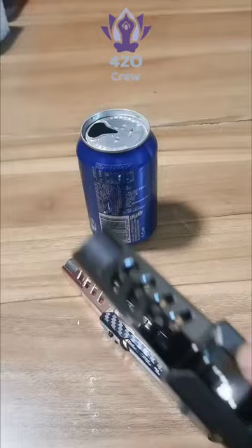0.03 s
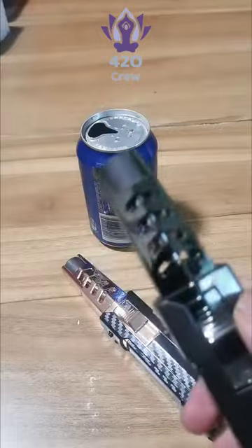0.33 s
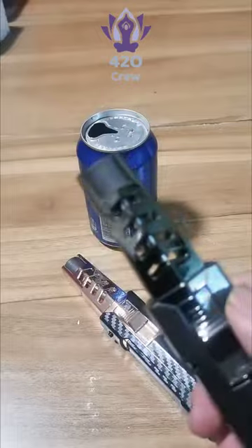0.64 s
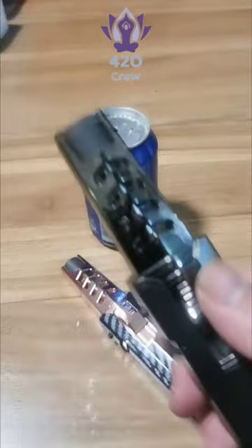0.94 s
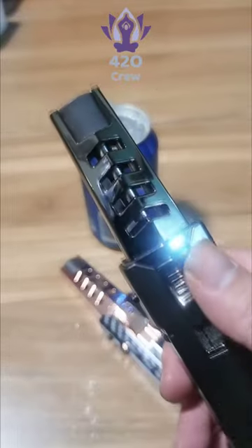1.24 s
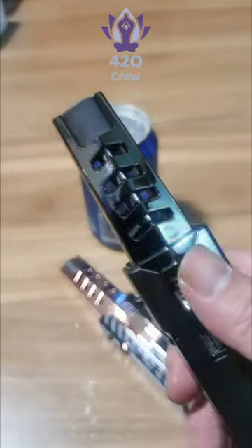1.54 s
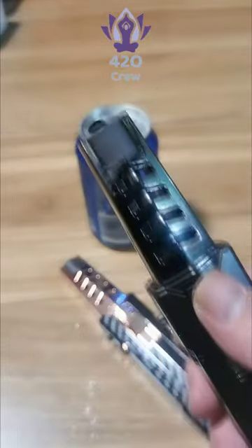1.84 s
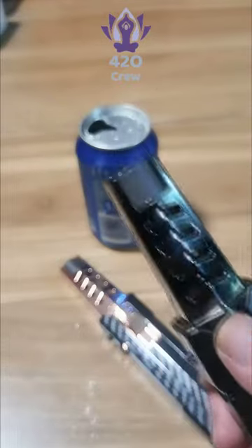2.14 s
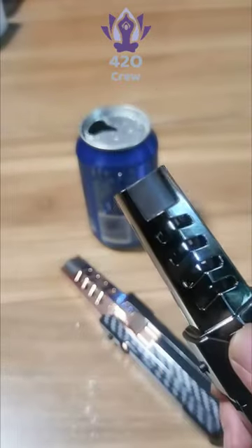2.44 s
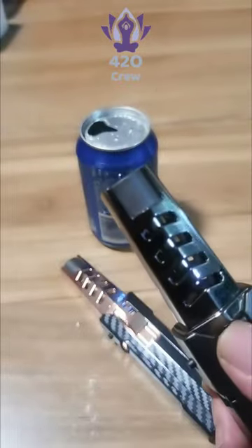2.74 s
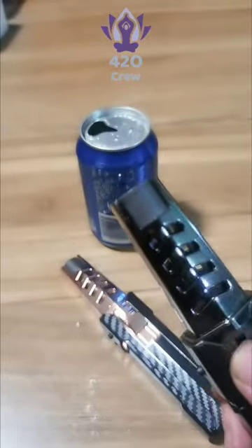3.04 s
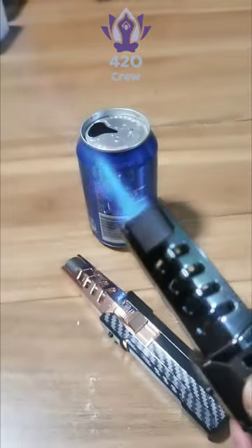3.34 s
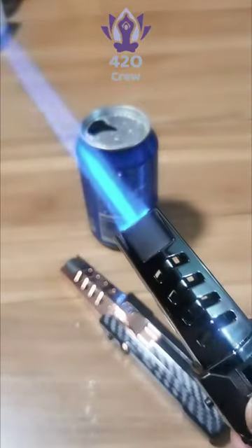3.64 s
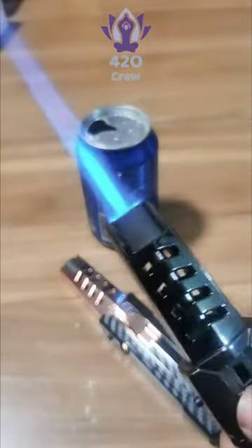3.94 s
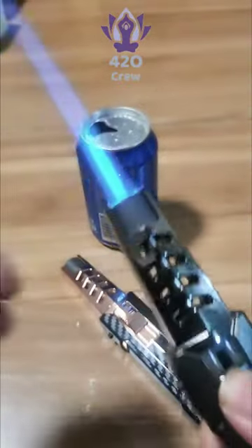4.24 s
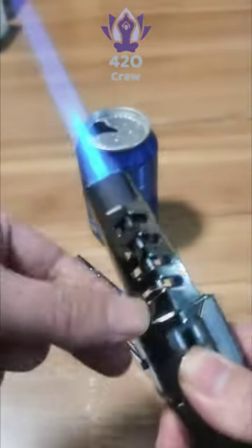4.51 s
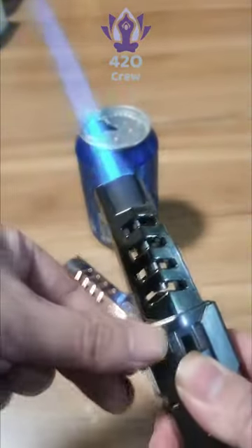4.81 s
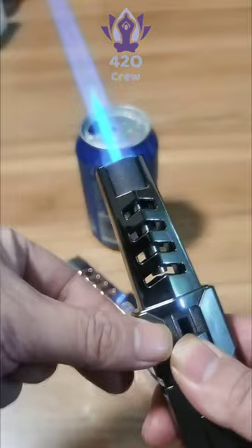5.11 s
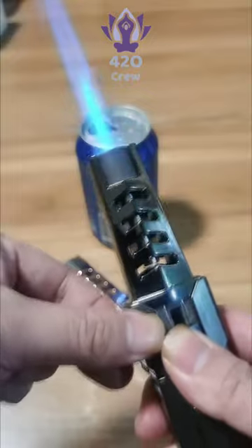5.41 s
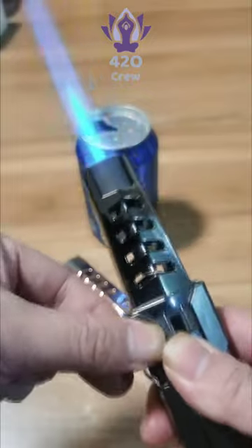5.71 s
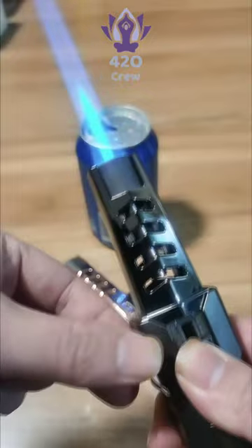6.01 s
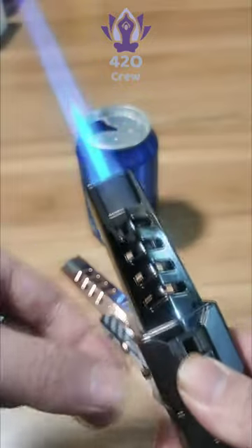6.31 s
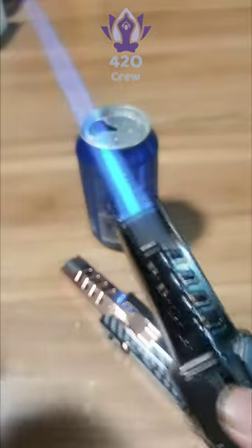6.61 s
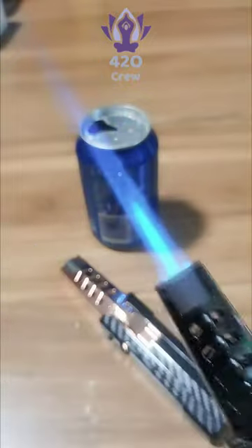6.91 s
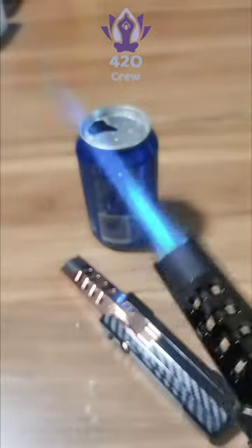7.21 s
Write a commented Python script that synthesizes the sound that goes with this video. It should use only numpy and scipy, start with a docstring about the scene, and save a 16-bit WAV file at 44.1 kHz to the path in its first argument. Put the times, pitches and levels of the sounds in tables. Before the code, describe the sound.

A torch lighter gives a short spurt of gas ending in a ringing metallic tick. Fingers rub and squeak faintly on its case. Then gas hisses steadily, the igniter snaps sharply, and the flame catches with a pop. It roars on under a bright hiss, with one more click partway through. The microphone is close, above a wooden table in a small room.

```python
"""A torch lighter is handled above a wooden table, close to a mono microphone in a small room.
First a short spurt of gas ends with a ringing tick, and fingers rub and squeak on the case.
At 3 s the valve opens and gas hisses. At 3.5 s the piezo (the spark maker) snaps and lights a flame,
which catches with a pop and roars on over the hiss of the jet. At 5.5 s the mechanism clicks once more."""
import sys
import numpy as np
from scipy import signal
from scipy.fft import rfft, irfft
from scipy.io import wavfile
from scipy.ndimage import map_coordinates

SR = 44100
rng = np.random.default_rng(int(sys.argv[2]) if len(sys.argv) > 2 else 0)


def dump_mix(stems):
    """Bounce the given channels to the path in sys.argv[1] as a 16-bit WAV at rate SR."""
    frames = np.atleast_2d(stems).T  # one column per channel
    limited = np.clip(frames, -1, 1)  # hard clip at full scale
    pcm = np.round(limited * 32767).astype(np.int16)
    wavfile.write(sys.argv[1], SR, pcm)


N = 320166
TIME, FREQS = np.arange(N) / SR, np.fft.rfftfreq(N, 1 / SR)
SPARK_S = 3.501  # the moment the gas is lit


def gain_of(db):
    """Turns decibels into a number to multiply by."""
    return 10 ** (np.asarray(db) / 20)


def evened(x):
    """Scales a signal to an average power of 1."""
    return x / np.sqrt(np.mean(x ** 2) + 1e-20)


def read(points, hz):
    """Looks up a value at hz, joining the points with straight lines on a scale of octaves."""
    point_hz, value = np.transpose(points)
    return np.interp(np.log(hz + 1), np.log(point_hz + 1), value)


def fade(start, length):
    """Rises from 0 to 1 over length seconds."""
    return np.clip((TIME - start) / length, 0, 1)


def envelope(start, rise_s, hold_s, fall_db_per_s):
    """A level that rises, holds, then dies away."""
    falling_s = np.maximum(TIME - start - rise_s - hold_s, 0)
    return fade(start, rise_s) * gain_of(-fall_db_per_s * falling_s)


def bell(offset, reach):
    """A bell curve: 1 at no offset, half the power at the reach."""
    return np.sqrt(.5 ** ((offset / reach) ** 2))


def add(mix, start, sound):
    """Mixes a sound in at start seconds."""
    part = mix[round(start * SR):][:len(sound)]
    part += sound[:len(part)]


def noise(gain):
    """Noise of power 1, shaped by a gain for each frequency."""
    return evened(irfft(rfft(rng.standard_normal(N)) * gain, N))


def airflow(colour, peaks=()):
    """Rushing noise: colour sets the balance of low and high, peaks boost narrow bands."""
    power = 1 + sum(gain_of(db) ** 2 / (1 + (2 * (FREQS - hz) / width) ** 2) ** 1.5
                    for hz, width, db in peaks)
    return noise(gain_of(read(colour, FREQS)) * np.sqrt(power))


def whistle(hz, width):
    """Noise gathered around one pitch."""
    return noise(1 / (1 + (2 * (FREQS - hz) / width) ** 2))


def flutter(rate_hz, depth_db):
    """A level that swells and sinks at random."""
    wander = noise(1 / (1 + (FREQS / rate_hz) ** 2))
    return evened(gain_of(depth_db * wander))


def colour_click(x, colour):
    """Colours a click without smearing it ahead of its start."""
    log_gain = np.log(gain_of(read(colour, abs(np.fft.fftfreq(2048, 1 / SR)))))
    taps = np.fft.ifft(np.exp(np.conj(signal.hilbert(log_gain)))).real
    return signal.oaconvolve(x, taps / np.linalg.norm(taps))[:N]


def room(x, first_echo_s=0.0072):
    """Echoes from the near walls blur into a tail in which the bass lasts longest."""
    # how long the room rings (frequency [Hz], time to fall 60 dB [s])
    ring_times = [(150, 1), (1000, 0.16), (5000, 0.28), (15000, 0.21)]
    hz, t, bands = signal.stft(rng.standard_normal(SR // 2), SR, nperseg=256)
    decay = gain_of(-60 * t / read(ring_times, hz)[:, None])
    tail = signal.istft(bands * decay, SR, nperseg=256)[1]
    tail *= np.arange(len(tail)) / SR > first_echo_s
    return signal.fftconvolve(x, tail / np.linalg.norm(tail))[:N]


def near_echoes(x, echo_db=-9, latest_s=.004, drift_s=.00009, drift_hz=0.86, count=5):
    """The table, the can and the hands throw back short echoes that shift as the lighter moves."""
    out = x.copy()
    for delay in np.geomspace(latest_s / 4, latest_s, count):
        path_s = delay + drift_s * whistle(0, 2 * drift_hz)
        echo = map_coordinates(x, [(TIME - path_s) * SR], order=3)
        out += gain_of(echo_db) / np.sqrt(count) * echo
    return out / np.sqrt(1 + gain_of(echo_db) ** 2)


def rumble():
    """The hand and the room make a dull, low rumble."""
    # tone of the rumble (frequency [Hz], level [dB])
    colour = [(20, -2), (50, 4), (75, -3.5), (120, -0.5), (200, -5), (290, -9.5), (500, -15.5),
              (1000, -19.5), (2000, -27), (4000, -36.5), (12000, -44)]
    # its peaks (frequency [Hz], width [Hz], boost [dB])
    peaks = [(109.5, 26, 3), (207, 51, 2.5), (392, 57, 3)]
    # its loudness (time [s], level [dB])
    levels = [(.14, -63.5), (1.0, -62), (2.4, -60), (3.2, -60)]
    level = gain_of(np.interp(TIME, *np.transpose(levels))) * fade(0.1285, 0.011)
    return level * airflow(colour, peaks) * flutter(rate_hz=6, depth_db=0.3)


def fingers():
    """Skin slides over the case and catches on it, making faint squeaks and low judders."""
    # finger strokes (start [s], rise [s], time until lifted [s], easing off [dB/s],
    # hiss [dB], scrape [dB])
    strokes = [(0.278, 0.027, 0.14, 140, -62, -60), (.34, .05, 0.38, 30, -74.5, -71.5),
               (.35, .012, .04, 140, -74, -64), (0.772, 0.018, .1, 110, -88, -73),
               (0.91, .015, 0.29, 55, -73, -67.5), (.92, 0.12, .27, 0, -69.5, -77),
               (1.489, 0.02, 0.09, 140, -64, -62.5), (1.72, .08, 0.84, 0, -74, -79),
               (2.058, 0.017, 0.11, 103, -62.5, -60), (2.134, 0.11, 0.56, 31, -73, -63),
               (2.641, .012, 0.089, 130, -62, -60), (2.69, .04, 0.18, 45, -76, -72)]
    # tone of the fine hiss (frequency [Hz], level [dB])
    hiss_colour = [(2000, -10), (4500, -1.5), (6500, 1), (10000, -1.5), (12500, -7.5), (14500, -15),
                   (16000, -22)]
    # tone of the coarser scrape (frequency [Hz], level [dB])
    scrape_colour = [(600, -4), (1400, -9), (1900, 3), (2400, 0), (3000, -3), (4300, -3.5), (5200, -47),
                     (9000, -20)]
    # its peaks (frequency [Hz], width [Hz], boost [dB])
    scrape_peaks = [(1360, 320, 5), (2360, 200, 1.5)]
    # skin catching (start [s], rough length [s], pitch [Hz], width [Hz], level [dB])
    squeaks = [(0.582, 0.14, 124, 70, -59), (.785, 0.066, 4070, 600, -77), (0.788, 0.083, 1630, 170, -60),
               (1.17, 0.082, 111, 50, -57.5), (1.26, 0.14, 362, 70, -70), (1.366, 0.18, 197, 100, -62.5),
               (1.772, 0.18, 181, 140, -56.5), (2.05, 0.088, 135, 70, -51.5),
               (2.17, 0.44, 2320, 260, -70.5), (2.195, 0.44, 109, 70, -60), (2.277, 0.24, 960, 170, -67.5),
               (2.403, 0.13, 191, 130, -58), (2.44, 0.33, 3250, 200, -75), (2.745, 0.16, 139, 130, -58),
               (2.784, 0.098, 3710, 383, -65.5), (2.783, 0.14, 1410, 170, -67),
               (2.833, 0.49, 667, 132, -69), (3.21, 0.078, 1910, 350, -64.5)]
    hiss_level, scrape_level = np.zeros(N), np.zeros(N)
    for start, rise, length, easing, hiss_db, scrape_db in strokes:
        stroke = envelope(start, rise, length - rise, fall_db_per_s=420)
        stroke *= gain_of(-easing * np.maximum(TIME - start - rise, 0))
        hiss_level = np.hypot(hiss_level, gain_of(hiss_db) * stroke)  # strokes add up in power
        scrape_level = np.hypot(scrape_level, gain_of(scrape_db) * stroke)
    rub = hiss_level * airflow(hiss_colour) + scrape_level * airflow(scrape_colour, scrape_peaks)
    rub *= flutter(rate_hz=190, depth_db=1.3)
    for start, length, hz, width, db in squeaks:
        shape = envelope(start, rise_s=.008, hold_s=.4 * length, fall_db_per_s=22 / length)
        rub += gain_of(db) * shape * whistle(hz, width)
    return rub * flutter(rate_hz=35, depth_db=0.66)  # the skin grips and slips unevenly


def snaps(thump_hz=165, thump_decay_s=0.035, thump_lag_s=0.00305, part_q=7):
    """Small parts slam and rattle briefly; the case rings and kicks back in the hand."""
    # hits in the mechanism (time [s], crack [dB], rattle length [s], pitch of the struck part [Hz],
    # its level [dB], case ring [dB], reach of the ring around that pitch [octaves], thump [dB])
    hits = [(.2808, -48, 0.0026, 4300, -46, -52, .6, -75),
            (0.2827, -55, 0.0028, 4730, -29.5, -35.5, .55, -72),
            (2.263, -56, 0.0011, 1320, -43.5, -70, 3, -64), (3.054, -45, 0.0082, 1200, -49, -64, 3, -66),
            (3.4888, -14, 0.0012, 2100, -22, -40.5, 5, -24),
            (5.4704, -18, 0.0021, 2350, -23.5, -44, 3, -50),
            (5.4715, -21.5, 0.0019, 4100, -17.5, -50, 3, -54)]
    # tone of the crack (frequency [Hz], level [dB])
    crack_colour = [(200, -37), (900, -11), (2200, 1), (2800, -3), (4100, 0), (5200, -3.5), (6400, 0.5),
                    (7600, -3), (10500, 0.5), (12300, -3.5), (13500, 1), (15000, -3), (16000, 3.5)]
    # notes of the metal case (pitch [Hz], level [dB], time to fall 60 dB [s])
    case_notes = [(2130, -23, .06), (2820, -11, .1), (4260, -2, 0.024), (4450, -1, 0.048),
                  (4850, -3, 0.062), (5000, -7, 0.082), (5100, -9, 0.063), (5300, -6, 0.038),
                  (6300, -10, .06), (7040, -7, 0.085), (7430, 0, 0.035), (9800, -1, 0.035),
                  (13550, -12, 0.092)]
    t = np.arange(SR // 4) / SR
    cracks, body = np.zeros(N), np.zeros(N)
    for start, crack_db, rattle_s, part_hz, part_db, ring_db, reach, thump_db in hits:
        contacts = rng.standard_normal(len(t)) * np.exp(-(t / rattle_s) ** 2 / 2)  # many tiny knocks
        add(cracks, start, gain_of(crack_db) * contacts * np.sqrt(rattle_s * SR) / np.linalg.norm(contacts))
        part = np.sin(2 * np.pi * part_hz * t) * np.exp(-np.pi * part_hz * t / part_q)  # dies quickly
        ring = np.zeros(len(t))
        for hz, db, decay_s in case_notes:
            level = gain_of(db - 60 * t / decay_s) * bell(np.log2(hz / part_hz), reach)
            ring += level * np.sin(2 * np.pi * (hz * t + rng.random()))
        ring *= 1 - np.exp(-2 * t / rattle_s)  # builds up during the rattle
        add(body, start, gain_of(part_db) * part + gain_of(ring_db) * ring)
        thump = -gain_of(thump_db - 60 * t / thump_decay_s) * np.sin(2 * np.pi * thump_hz * t)
        add(body, start + thump_lag_s, thump)
    return colour_click(cracks, crack_colour) + body


def gas_spurt(open_s=0.132, shut_s=.28, settled_db=-50.5, overshoot_db=8.5, settle_s=0.096):
    """The valve opens briefly: the pressure jumps and settles, then the gas drains and seeps away."""
    # tone of the spurt (frequency [Hz], level [dB])
    colour = [(300, -3), (700, -11.5), (1100, -0.5), (1500, -1.5), (3400, 6), (4400, 0.5), (5100, -5),
              (7000, 0), (13500, 0.5), (16000, -2)]
    # its peaks (frequency [Hz], width [Hz], boost [dB])
    peaks = [(1120, 190, 4.7), (1810, 170, 4.9), (2280, 220, 13.7), (4260, 260, 12)]
    pressure = gain_of(settled_db + overshoot_db * np.exp(-np.maximum(TIME - open_s, 0) / settle_s))
    flow = pressure * envelope(open_s, rise_s=.004, hold_s=shut_s - open_s, fall_db_per_s=900)
    drain = gain_of(-61) * envelope(shut_s, rise_s=0.036, hold_s=0.061, fall_db_per_s=260)
    seep = gain_of(-75) * envelope(shut_s, rise_s=.05, hold_s=.2, fall_db_per_s=60)
    spurt = (flow + drain) * airflow(colour, peaks) * flutter(rate_hz=110, depth_db=0.5)
    return spurt + seep * whistle(hz=12100, width=2900)


def unlit_gas(open_s=3.0095, level_db=-49):
    """Cold gas hisses steadily through the barrel until the spark."""
    # tone of the gas (frequency [Hz], level [dB])
    colour = [(300, 3.5), (700, 3), (1400, -6), (2800, -0.5), (4900, 0.5), (7500, 4.5), (10500, 4.5),
              (13800, 3), (16000, -4)]
    # where the cold barrel rings (frequency [Hz], width [Hz], boost [dB])
    peaks = [(1930, 66, 3.3), (3780, 270, 21), (5930, 770, 10), (7700, 400, 8.3), (8400, 780, 12),
             (10500, 330, 5), (11280, 300, 12.5), (12700, 500, 2.8), (14820, 420, 13)]
    flow = envelope(open_s, rise_s=0.023, hold_s=SPARK_S - open_s - .02, fall_db_per_s=150)
    return gain_of(level_db) * flow * airflow(colour, peaks) * flutter(rate_hz=80, depth_db=-0.5)


def beam(aim, spread):
    """Treble leaves the barrel in a beam: full at the slant aim, half the power spread degrees off."""
    # the hand turning the barrel (time [s], slant from straight ahead [degrees])
    slants = [(3.6, 29), (4.33, 31.8), (4.5, 23), (4.6, 26), (4.95, 23), (5.15, 17.6), (5.6, 18), (6.0, 19),
              (6.4, 22), (6.55, 25.5), (6.75, 28), (7.03, 40), (7.26, 39.7)]
    slant = np.interp(TIME, *np.transpose(slants))
    return bell(slant - aim, spread)


def burning_jet(hiss_db=-50.5):
    """In the hot barrel the jet rings at new pitches, which swell and sink as the barrel turns."""
    # tone of the jet (frequency [Hz], level [dB])
    colour = [(1500, -24), (2700, -10), (3400, 4.5), (4400, 1), (4850, -2.5), (6200, -2.5), (7300, -12),
              (8700, -28.5), (9800, -2), (11700, 0.5), (12700, -0.5), (14000, -8), (15700, -5),
              (16000, -14)]
    # steadier peaks of the hot barrel (frequency [Hz], width [Hz], boost [dB])
    peaks = [(4290, 350, 3), (5460, 200, 3), (10400, 670, 3), (10840, 640, 2.4), (14700, 380, 11),
             (15500, 300, 4)]
    # its strong whistles (pitch [Hz], width [Hz], level [dB],
    # slant that faces the microphone [degrees], half-width of the beam [degrees])
    whistles = [(2480, 850, -51.5, 46.9, 14.6), (3983, 360, -53.5, 43.2, 12.7),
                (7410, 1060, -53.5, 20.8, 11), (7900, 700, -59.5, 27.3, 2.5), (9900, 3700, -54.5, 30.7, 7)]
    hiss = gain_of(hiss_db) * beam(aim=21.4, spread=15.3) * airflow(colour, peaks)
    for hz, width, db, aim, spread in whistles:
        hiss += gain_of(db) * beam(aim, spread) * whistle(hz, width) * flutter(rate_hz=13, depth_db=0.54)
    return hiss * fade(SPARK_S, 0.17) * flutter(rate_hz=120, depth_db=0.82)


def ignition(pop_s=3.6791, pop_db=-14.5, swing_s=0.00038, flare_db=-24.5, afterburn_db=-41):
    """The gathered gas goes off: one pressure swing and a ragged, spitting flare that burns out."""
    # tone of the flare (frequency [Hz], level [dB])
    flare_colour = [(30, -47), (90, -1.5), (200, 1), (420, 0.5), (1050, -5.5), (1500, -12.5), (2800, -22),
                    (3900, -18.5), (5200, -21.5), (8500, -21), (11000, -16), (14000, -22), (15700, -14)]
    # a bright band and a thin, very high whistle heard during the pop
    # (frequency [Hz], width [Hz], boost [dB])
    bright_bands = [(3760, 400, 4), (15500, 150, 12.5)]
    # sharp spits in the flare (time [s], length [s], level [dB])
    spits = [(3.682, .0004, -31), (3.698, 0.0011, -26.5)]
    # their tone (frequency [Hz], level [dB])
    spit_colour = [(500, -5), (2800, 2), (4000, 7.5), (5200, -7), (8000, -12), (11500, 1), (14000, -1),
                   (16000, -10)]
    swing_time = (TIME - pop_s) / swing_s
    swing = gain_of(pop_db) * swing_time * np.exp((1 - swing_time ** 2) / 2)
    burn = gain_of(flare_db) * envelope(pop_s - .0055, rise_s=0.0059, hold_s=0.019, fall_db_per_s=430)
    burn += gain_of(afterburn_db) * envelope(pop_s - .014, rise_s=0.094, hold_s=.055, fall_db_per_s=250)
    burst = burn * airflow(flare_colour, bright_bands) * flutter(rate_hz=230, depth_db=1.0)
    spitting = sum(gain_of(db) * np.exp(-((TIME - at) / length) ** 2 / 2) for at, length, db in spits)
    return swing + burst + spitting * airflow(spit_colour)


def flame(first_db=-51, grow_db_per_s=86, full_db=-37.5, surge_s=3.932, surge_db=-44):
    """The flame grows from the spark and surges once; swirls burn unevenly, so the roar is lumpy."""
    # tone of the roar (frequency [Hz], level [dB])
    colour = [(15, -19), (35, -19), (70, -15.5), (105, -8.5), (190, -2.5), (290, 0.5), (390, -6.5),
              (500, -8.5), (790, -3.5), (1080, -5), (1450, -14), (1830, -11.5), (2130, -24.5), (3000, -36),
              (6000, -38)]
    # its humps (frequency [Hz], width [Hz], boost [dB])
    humps = [(178, 28, 3.5), (241.6, 52, 2.5), (349, 30, 1), (544, 62, 2.5), (662, 50, 1.5), (722, 21, 4.5),
             (920, 98, -5.5), (1118, 24, 1.5), (1250, 36, -4)]
    size_db = np.minimum(first_db + grow_db_per_s * (TIME - SPARK_S), full_db)
    size = fade(SPARK_S, 0.0076) * gain_of(size_db)
    size += gain_of(surge_db) * envelope(surge_s, rise_s=.012, hold_s=.008, fall_db_per_s=398)
    roar = airflow(colour, humps) * flutter(rate_hz=80, depth_db=1.0)
    return size * roar * flutter(rate_hz=23, depth_db=0.3)


def scene():
    """All sources reach one microphone, heard alike in both ears."""
    clicks, pop, roar = snaps(), ignition(), flame()
    hiss = gas_spurt() + unlit_gas() + near_echoes(burning_jet())
    to_walls = gain_of(-14.5) * clicks + gain_of(-18) * pop + gain_of(-15.5) * roar + gain_of(-13) * hiss
    mono = room(to_walls) + fingers() + rumble() + clicks + hiss + pop + roar
    return np.array([mono, mono])


def record(dry):
    """Cuts off the very highest treble."""
    low_pass = signal.firwin(511, cutoff=15850, window=("kaiser", 9), fs=SR)
    return signal.oaconvolve(dry, low_pass[None], "same")


dry = scene()
out = record(dry)
dump_mix(out)
```